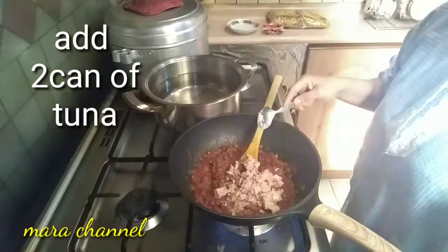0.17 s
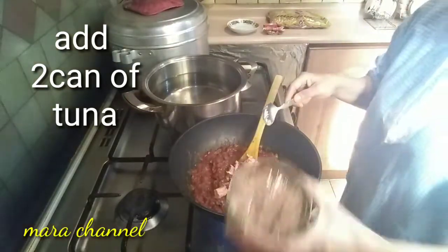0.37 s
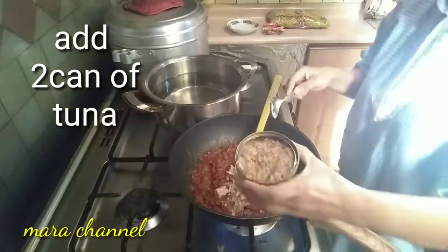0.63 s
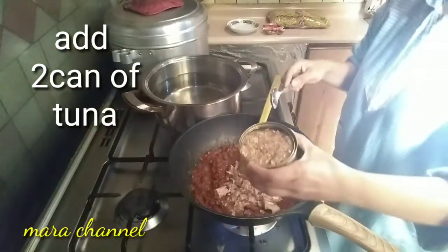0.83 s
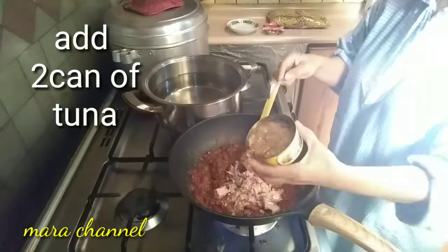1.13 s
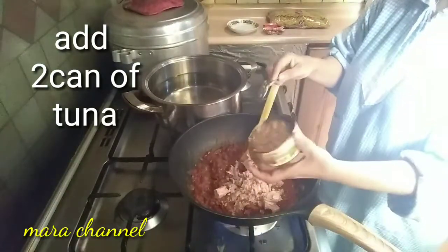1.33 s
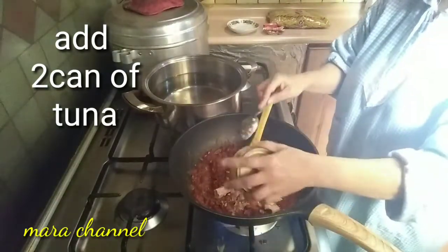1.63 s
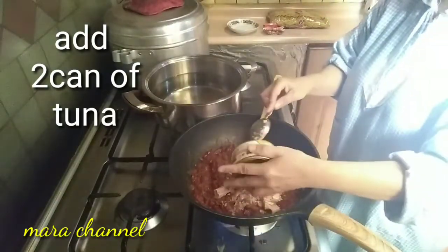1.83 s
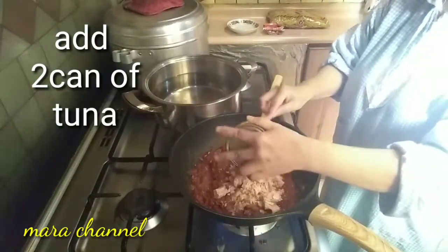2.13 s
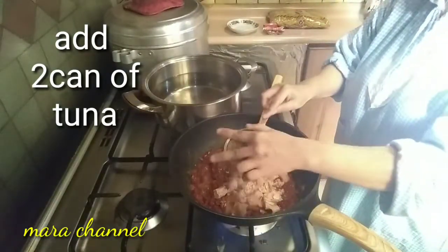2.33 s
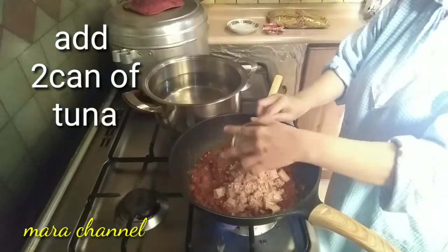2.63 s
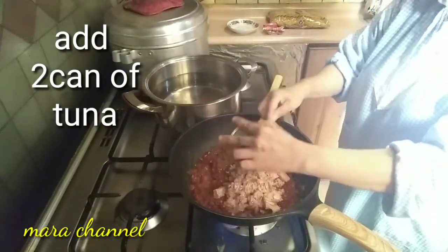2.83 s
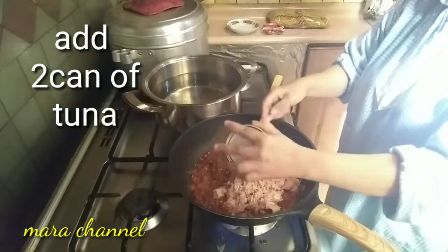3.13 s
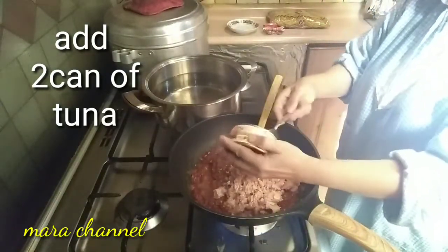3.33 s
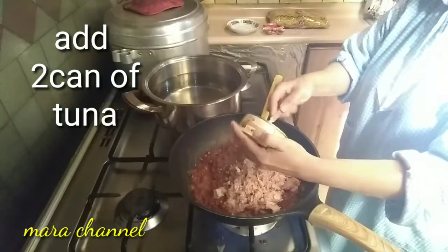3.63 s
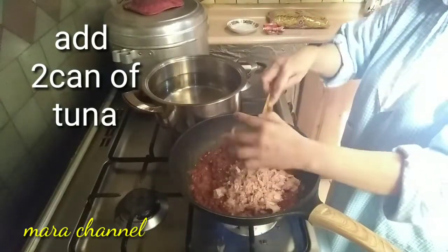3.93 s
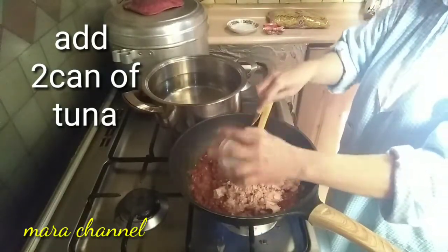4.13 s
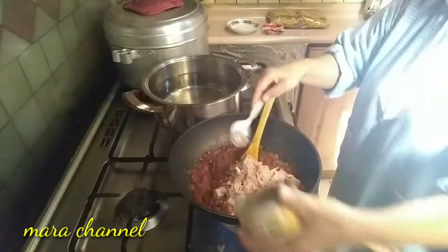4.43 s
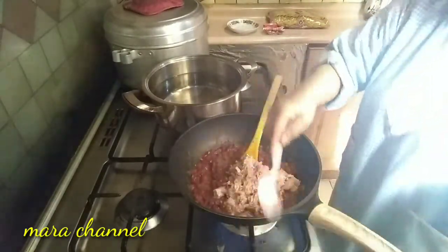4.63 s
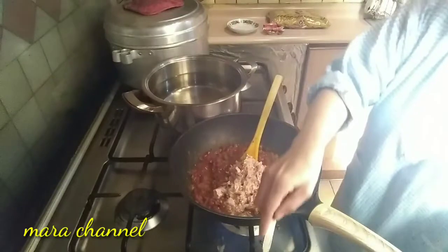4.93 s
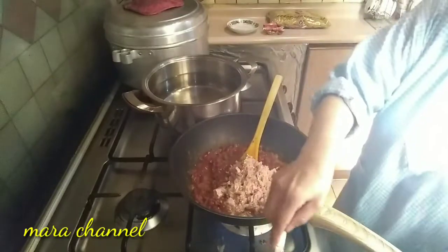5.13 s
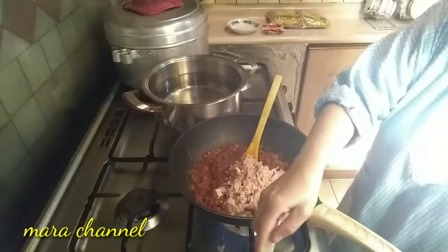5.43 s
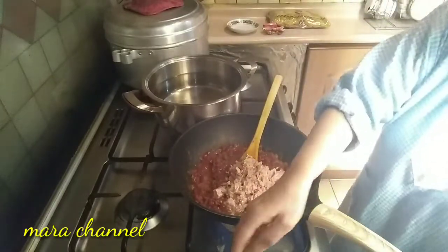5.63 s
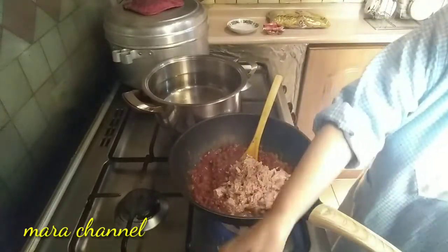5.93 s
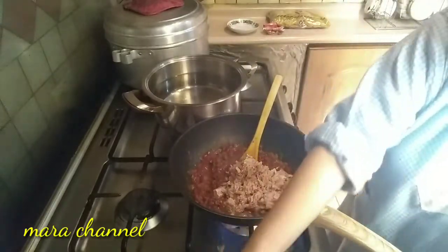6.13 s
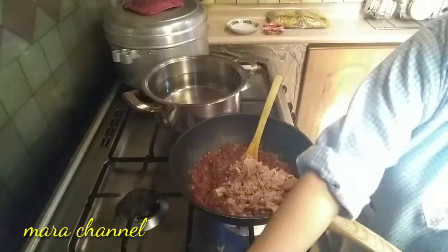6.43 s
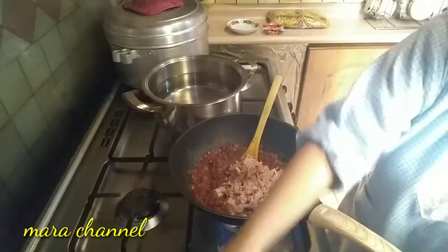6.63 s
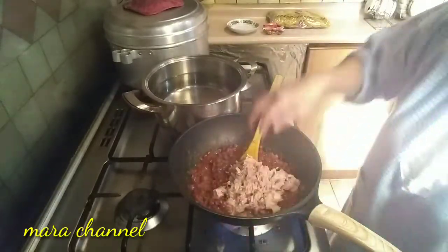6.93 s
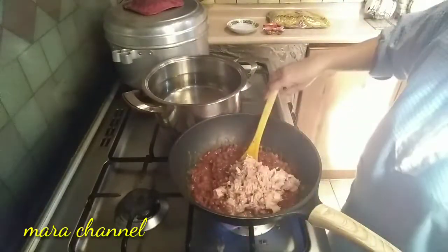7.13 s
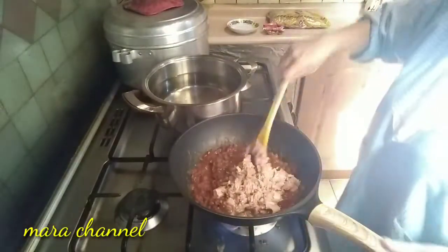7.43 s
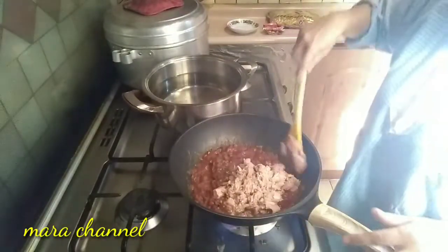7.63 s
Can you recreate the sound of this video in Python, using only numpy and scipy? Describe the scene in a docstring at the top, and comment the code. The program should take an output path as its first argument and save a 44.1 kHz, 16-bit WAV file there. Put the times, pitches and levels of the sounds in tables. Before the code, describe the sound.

A fork taps, knocks and scrapes tuna from a tin over a pan, then clatters down, above a low burner rumble and faint sizzle.

```python
"""First one hears a gas burner rumbling low at the stove and sauce sizzling faintly: shaped noise, narrow
hum resonances and fine pops. Food plops and pan shifts are low decaying sines; slides and cloth are noise.
In front, a fork knocks and scrapes tuna out of a tin can over a frying pan, then is laid down with a clatter:
damped beating modes with a crack and a crash, the scrape a train of tiny slips.
A small tiled kitchen answers with a short diffuse tail; one microphone channel."""
import sys
import numpy as np
from scipy import signal
from scipy.fft import rfft, irfft, next_fast_len
from scipy.io import wavfile
from scipy.ndimage import uniform_filter1d, map_coordinates

SR = 44100
rng = np.random.default_rng(int(sys.argv[2]) if len(sys.argv) > 2 else 0)


def to_wav(s):
    """Save 16-bit WAV."""
    ch = np.atleast_2d(s).T  # columns
    pcm = np.round(np.clip(ch, -1, 1) * 32767)  # PCM
    wavfile.write(sys.argv[1], SR, pcm.astype(np.int16))


N = 342642  # samples

# Spectra and modes carry relative levels; sounds are scaled to their level afterwards.
# burner rumble: [f/Hz, density level/dB]
BURNER = [(12, -55), (20, -30), (38, -11), (46, -28), (64, -4.5), (93, -1.5), (113, 1), (160, -4),
          (178, -3.5), (242, -2.5), (387, -11), (439, -7.5), (630, -12.5), (905, -19.5), (1500, -26.5),
          (1950, -48), (3300, -120)]
# surging low rumble: [f/Hz, density level/dB]
SWELL = [(90, -20), (170, -10), (275, 3.5), (340, -20.5), (460, -18.5), (800, -52), (2000, -120)]
# surges of that rumble, before the swell gain: [start t/s, length t/s, level/dB]
SURGES = [(0, 0.36, -46.5), (.42, 0.059, -42), (.73, 0.027, -34), (4.23, 0.077, -38.5), (6.7, 0.11, -45),
          (7.27, 0.11, -48)]
SURGE_ATTACK_S, SURGE_RELEASE_S = 0.015, 0.11
# narrow resonances of the hum, before the hum gain: [f/Hz, width f/Hz, rms level/dB]
HUM = [(70.3, 13.3, -51), (121.9, 2.9, -54), (153.6, 9.2, -53.5), (192.4, 25, -55), (236.1, 5.2, -56),
       (435, 18, -64.5)]
# sizzling sauce: [f/Hz, density level/dB]
SIZZLE = [(710, -11), (1200, -10.5), (1900, -2), (3200, -3), (4900, -5.5), (6000, -3), (6900, -7),
          (7800, -14), (10000, -17.5), (13500, -23.5), (15500, -30)]
# decay of the tiled kitchen: [f/Hz, t60 t/s]
KITCHEN = [(100, 0.3), (1000, 0.23), (4800, 0.18), (5300, 0.27), (6300, 0.31), (8500, 0.32), (14000, 0.26)]

# dull slides on the stove top: [start t/s, length t/s, level/dB]
SLIDES = [(5.71, 0.08, -53), (5.84, 0.055, -57), (5.955, 0.056, -55), (6.29, 0.052, -52)]
SLIDE_ATTACK_S, SLIDE_RELEASE_S = 0.014, 0.17
# dull knocks on the stove top: [start t/s, length t/s, level/dB]
NUDGES = [(5.488, 0.022, -50), (6.015, 0.012, -46.5)]
# colour of slides and dull knocks: [f/Hz, density level/dB]
SLIDE = [(300, -24), (600, -2), (800, 5), (980, 4), (1250, -10.5), (2300, -19), (7000, -72)]
# faint sleeve rustles as the arm moves: [start t/s, length t/s, level/dB]
RUSTLES = [(4.25, 0.17, -65.5), (4.58, 0.24, -64.5), (7.6, .08, -65)]
# sleeve cloth: [f/Hz, density level/dB]
CLOTH = [(500, -30), (1300, -4), (2300, 2), (3500, -3), (7000, -30)]
# the wooden spoon starts to stir: [start t/s, length t/s, level/dB]
STIR = [(7.71, 0.028, -54.5)]
# soft bumps of food, hand and pan, before rise and bump gain: [t/s, level/dB, f/Hz]
BUMPS = [(0.785, -25, 143.4), (0.829, -22.5, 118), (0.877, -21, 110), (1.11, -29, 211), (1.427, -21, 87),
         (1.489, -26, 144), (1.918, -25, 69.6), (1.971, -20.5, 73), (2.167, -26.5, 77),
         (2.304, -20.5, 66.4), (2.611, -24.5, 78), (2.697, -20, 78), (3.565, -28, 70.6), (4.778, -25, 121),
         (5.245, -31, 73.4), (6.521, -30.5, 200), (7.616, -26.5, 72)]

# tines dragged along the can wall: [start t/s, length t/s, ring level/dB, grit level/dB]
SCRAPES = [(3.598, 0.054, -51, -40), (3.659, 0.069, -42.5, -56), (3.745, 0.045, -50, -55),
           (3.806, 0.074, -39, -45), (3.858, 0.03, -46, -33.5), (3.932, 0.024, -50, -44)]
SCRAPE_ATTACK_S, SCRAPE_RELEASE_S = 0.023, 0.11
# rasp of tines on tin, also colours the spoon: [f/Hz, density level/dB]
GRIT = [(1200, -38), (2250, -25), (2680, -11), (3050, -21), (3580, 12), (3850, -20), (4300, 5), (4800, -19),
        (5150, 7), (5900, 8), (7000, 0), (11000, -13), (14500, -48)]

# light ticks of the tines:
# [t/s, thud, body, ring, shimmer, sparkle level/dB, hardness level/dB]
TICKS = [(2.0772, -49, -48.5, -36, -41.5, -58, -1.5), (2.111, -74, -66, -46.5, -46.5, -67, 0),
         (2.5171, -62, -58.5, -41, -33, -46.5, 2), (2.533, -72, -60, -45, -51, -52, -5),
         (3.052, -80, -75, -70, -60, -70.5, -3), (3.8799, -73, -70, -46.5, -41, -58, -3),
         (3.8925, -75, -70, -50.5, -41, -48, 3)]
# fork blows on the can, and one later tap, perhaps on the pan:
# [t/s, thud, body, ring, shimmer, sparkle level/dB,
# ring length factor, place in the can's modes (0 rim, 1 wall), hardness level/dB]
KNOCKS = [(2.3179, -33, -30.5, -18, -19.5, -33.5, 0.74, 0.24, -4),
          (2.6838, -35, -32, -27.5, -34.5, -43, 0.54, 0.93, -6.5),
          (2.9064, -42.5, -80, -66, -67, -71, 0.43, 0, -15),
          (3.5875, -63, -42.5, -32, -31.5, -45, 0.53, 0.67, -10.5),
          (3.6, -56, -49, -33.5, -34.5, -48, 0.8, 0.65, -17),
          (3.752, -56, -48.5, -52, -50, -80, 0.44, 0.27, -23),
          (3.952, -39, -45, -58, -69, -72, 0.26, 0.02, -22),
          (5.0412, -47.5, -49.5, -46, -44, -44, 0.54, 0.15, -10)]
# fork set down and rocking: [t/s, thud, body, ring, shimmer, sparkle level/dB,
# ring length factor, place (0 tines, 1 handle), hardness level/dB]
CLATTER = [(5.2269, -44.5, -45, -43, -43, -64, 1.6, 0.81, -9),
           (5.292, -36, -40.5, -32, -33, -45.5, 0.92, 0.84, -11),
           (6.4344, -57, -35, -43, -42, -60, 0.45, 0.05, -10),
           (6.4462, -36, -28.5, -29, -31, -47, 0.83, 0.028, -7.5),
           (6.47, -43, -30.5, -35, -47, -62, 0.24, 0, -6),
           (6.483, -39, -40, -28.5, -27.5, -42, 0.5, 0.39, -5),
           (6.4921, -55, -34, -30.5, -35, -48, 0.5, 0.054, -10),
           (6.4961, -45.5, -36, -51, -41, -56, 0.42, 0.13, 1),
           (6.5089, -50, -38.5, -41, -43, -60, 0.33, 0.0049, -7),
           (6.522, -64, -48, -42, -53, -57, 0.3, 0, 6)]
# thud, body, ring, shimmer, sparkle: [low edge f/Hz, high edge f/Hz]
BANDS = [(250, 1100), (1100, 2200), (2200, 4900), (4900, 8000), (8000, 17000)]
# tines ringing freely: [f/Hz, level/dB, t60 t/s]
TINES = [(1455, 0, 0.075), (2393, -4.5, 0.073), (2770, -1.5, 0.14), (3150, 0, 0.14), (4100, 5, .07),
         (5340, 5, 0.075), (6060, 7, 0.064)]
# can with the fork on it, t60 before the length factor: [f/Hz, rim level/dB, wall level/dB, t60 t/s]
CAN = [(623, -3.5, -18, 0.22), (843.5, -16, 0, 0.21), (1451, 2.5, 5, 0.15), (1694, -18, 1.5, 0.28),
       (1886, -17, 0, 0.29), (2404, -3.5, -19.5, 0.1), (2663, -8, 2, 0.28), (3194, -11, -16.5, 0.29),
       (3440, 9, 8, 0.11), (3510, 5, 8.5, 0.06), (4120, 3, -11.5, 0.17), (4290, -3, 2, 0.11),
       (4510, 8, -15, 0.13), (5260, 2.5, 1.5, 0.13), (5570, 3, -7.5, 0.19), (5950, 8, -1, 0.1),
       (6230, -4, 1, 0.075), (7500, -24, -8, 0.11), (12900, 3, -34, 0.08), (15500, 4, -39, 0.076)]
# fork on the stove top, t60 before the length factor: [f/Hz, tines level/dB, handle level/dB, t60 t/s]
FORK = [(1071, 6, -1.5, 0.056), (1167, 11.5, -8, 0.038), (1410, -23, -15.5, 0.19), (2360, 2.5, -7.5, 0.054),
        (2590, -7, -9.5, 0.18), (3460, -19, 7, 0.13), (4110, 3, -6, 0.11), (4320, 2, -4, 0.11),
        (5190, 5, -2, 0.095), (5350, 4, 10, 0.074), (5570, 13, -2, 0.06), (5810, -1, 10, 0.07),
        (5960, 2, -2, 0.11), (7300, -11, -1, 0.084), (9360, -17, -20, .09)]
# crowded, short-lived overtones of thin metal: [f/Hz, density level/dB]
CRASH = [(300, -34), (700, -15), (1100, -6.5), (2100, -7), (2700, -2), (4300, -3.5), (4850, 3.5),
         (5500, 3.5), (6500, 2.5), (7800, -7.5), (11000, -18), (15500, -28)]
LEAD_S = .01  # silence ahead of each blow
TOP_HZ = 15520  # upper band limit of the recorder


def amp(db):
    """Decibels to gain."""
    return 10 ** (np.asarray(db) / 20)


def unit(x):
    """Scale to rms 1."""
    return x / np.sqrt(np.mean(x ** 2) + 1e-20)


def along(points, hz):
    """Interpolate (f/Hz, value) points on a log frequency axis."""
    f, v = np.transpose(points)
    return np.interp(np.log(hz + 1), np.log(f + 1), v)


def wobble(rate):
    """A smooth random curve through rate knots a second."""
    knots = rng.standard_normal(int(N * rate / SR) + 4)
    return map_coordinates(knots, [np.arange(N) * rate / SR])


def filtered(x, response):
    """Multiply the spectrum of x by a response of frequency."""
    m = next_fast_len(len(x) + SR // 4)
    hz = np.fft.rfftfreq(m, 1 / SR)
    return irfft(rfft(x, m) * response(hz), m)[:len(x)]


def coloured(x, spectrum):
    """Shape x by a table of (f/Hz, level/dB) and scale to rms 1."""
    return unit(filtered(x, lambda hz: amp(along(spectrum, hz))))


def noise(spectrum, size):
    """Coloured noise of rms 1."""
    return coloured(rng.standard_normal(size), spectrum)


def patchy(x, depth_db, size):
    """Let spectral regions, size bins of 43 Hz wide, swell and sink on their own; rms 1."""
    z = signal.stft(x, nperseg=1024)[2]
    across_bins = uniform_filter1d(rng.standard_normal(z.shape), size, 0)
    field = uniform_filter1d(across_bins, 6, 1)  # smooth over frames
    return unit(signal.istft(z * amp(depth_db * unit(field)), nperseg=1024)[1][:len(x)])


def strokes(rows, attack_s, release_s):
    """Gain per sample: each stroke builds up, holds for its length, then dies by 60 dB per release."""
    t = np.arange(N) / SR
    gain = np.zeros(N)
    for s, length, db in rows:
        rise = np.clip((t - s) / attack_s, 0, 1)
        fall_db = -60 * np.clip((t - s - length) / release_s, 0, 2)
        gain += rise * amp(db + fall_db)
    return gain


def add(track, s, sound):
    """Mix a sound into the track at time s."""
    part = track[max(round(s * SR), 0):][:len(sound)]
    part += sound[:len(part)]


def in_kitchen(x, wet_db):
    """Direct sound plus a slightly later diffuse tail whose decay time depends on frequency."""
    hz, t, z = signal.stft(rng.standard_normal(SR // 2), SR, nperseg=256)
    decay = amp(-60 * t / along(KITCHEN, hz)[:, None])
    tail = signal.istft(z * decay, SR, nperseg=256)[1]
    tail = np.pad(tail / np.linalg.norm(tail), (130, 0))  # 3 ms behind the direct sound
    return x + amp(wet_db) * signal.fftconvolve(x, tail)[:len(x)]


def burner(level_db=-48.5):
    """The flame's lumpy rumble: low noise whose level and spectral regions waver."""
    return amp(level_db) * patchy(noise(BURNER, N) * amp(wobble(25)), depth_db=3.5, size=3)


def surges(swell_db=-5.0, rest_db=-51, restless_db=6.0):
    """Low rumble at the stove: restless noise that surges at set times."""
    gain = amp(rest_db + restless_db * wobble(4.6)) + strokes(SURGES, SURGE_ATTACK_S, SURGE_RELEASE_S)
    return amp(swell_db) * gain * patchy(noise(SWELL, N), depth_db=5.5, size=2)


def hum(hum_db=-1):
    """Noise through narrow resonances makes a low hum."""
    track = np.zeros(N)
    for hz, width, db in HUM:
        resonance = filtered(rng.standard_normal(N), lambda f: 1 / (1 + ((f - hz) / width * 2) ** 2))
        track += amp(db + hum_db) * unit(resonance)
    return track


def sizzle(level_db=-60.5, pops_per_s=120, pop_db=-15):
    """Fine bubbles in the sauce: hiss mixed with sparse random pops."""
    pops = (rng.random(N) < pops_per_s / SR) * rng.standard_normal(N)
    fizz = patchy(rng.standard_normal(N) + amp(pop_db) * unit(pops), depth_db=1.3, size=14)
    return amp(level_db) * coloured(fizz, SIZZLE)


def stove():
    """The steady background: flame, surges, hum and sauce together."""
    return burner() + surges() + hum() + sizzle()


def sleeve():
    """Cloth rustles as gently uneven noise under slow strokes."""
    gain = strokes(RUSTLES, attack_s=0.035, release_s=0.17)
    return gain * unit(noise(CLOTH, N) * amp(1.1 * wobble(40)))


def spoon():
    """The wet rub of the wooden spoon: a brief stroke of gritty noise."""
    return strokes(STIR, attack_s=0.017, release_s=0.17) * noise(GRIT, N)


def slides():
    """Dull knocks and uneven sliding on the stove top, from noise of fluctuating level."""
    push = strokes(SLIDES, SLIDE_ATTACK_S, SLIDE_RELEASE_S)
    push += strokes(NUDGES, attack_s=0.0016, release_s=0.13)
    return push * unit(noise(SLIDE, N) * amp(2.4 * wobble(100)))


def handling():
    """Sliding, sleeve and spoon with very little of the room."""
    return in_kitchen(slides() + sleeve() + spoon(), wet_db=-25)


def bumps(t60=0.13, rise=0.0055, gain_db=-1):
    """Soft, heavy contacts push a few low cycles out of pan and stove."""
    track, t = np.zeros(N), np.arange(SR // 3) / SR
    for s, db, hz in BUMPS:
        envelope = amp(db + gain_db - 60 * t / t60) * (1 - np.exp(-t / rise))
        add(track, s, envelope * np.sin(2 * np.pi * hz * t))
    return in_kitchen(track, wet_db=-5.0)


def struck(modes, place, length):
    """Modes (f/Hz, level/dB, t60/s) excited between the two ends, with t60 scaled by length for the grip."""
    place = np.clip(place, 0, 1)
    return [(hz, near + place * (far - near), t60 * length) for hz, near, far, t60 in modes]


def ringing(modes, t, scatter_db, waver, split_hz=32):
    """Damped modes in beating pairs; the shifting contact varies strengths and lets phases wander."""
    hz, db, t60 = np.transpose(modes)[:, :, None]
    strength, start, split = rng.standard_normal((3, len(modes), 1))
    walk = np.cumsum(rng.standard_normal((len(modes), len(t))), 1)
    drift = uniform_filter1d(walk, 60, axis=1)
    cycles = hz * t + start + waver * np.sqrt(hz) * drift / SR
    partner = cycles + split_hz * (2 + split) * t  # typically twice split_hz above
    pair = np.sin(2 * np.pi * cycles) + .5 * np.sin(2 * np.pi * partner)
    return np.sum(amp(db + scatter_db * strength - 60 * t / t60) * pair, 0)


def scrape(slips_per_s=1100, damping=0.64, uneven_db=5, bend=0.008):
    """Tines slip in tiny uneven jerks, ringing the can wall under a rasp; changing pressure bends its pitch."""
    slips = (rng.random(N) < slips_per_s / SR) * amp(uneven_db * rng.standard_normal(N))
    wall = [mode for mode in struck(CAN, 1, damping) if 2500 < mode[0] < 7000]
    tone = ringing(wall, np.arange(SR // 4) / SR, scatter_db=1, waver=7)
    ring = signal.fftconvolve(slips, tone)[:N]
    ring = patchy(ring, depth_db=1.5, size=8)  # the moving contact favours now one mode, now another
    ring = map_coordinates(ring, [np.arange(N) + np.cumsum(bend * wobble(20))])
    grit = coloured(slips + 0.18 * rng.standard_normal(N), GRIT)
    ring_rows = [(s, length, db) for s, length, db, _ in SCRAPES]
    grit_rows = [(s, length, db) for s, length, _, db in SCRAPES]
    ring_gain = strokes(ring_rows, SCRAPE_ATTACK_S, SCRAPE_RELEASE_S)
    grit_gain = strokes(grit_rows, SCRAPE_ATTACK_S, SCRAPE_RELEASE_S)
    return in_kitchen(ring_gain * ring + grit_gain * grit, wet_db=-8.0)


def blow(modes, levels, hard_db, crash_t60, rise, crack_db=7, crack_t60=0.0086):
    """Metal on metal: ringing, a sharp crack and a short crash; harder contacts crash more and start faster."""
    t = np.arange(SR // 2) / SR
    overtones = patchy(noise(CRASH, len(t)), depth_db=4.5, size=3)  # each contact favours its own few
    decay = amp(-60 * t / crash_t60) + amp(crack_db - 60 * t / crack_t60)
    crash = amp(hard_db) * decay * overtones
    tone = ringing(modes, t, scatter_db=1, waver=10)
    tone = tone / np.std(tone[:SR // 200])  # by its first 5 ms
    attack = 1 - np.exp(-t * amp(hard_db) / rise)
    lead = round(LEAD_S * SR)  # room for the zero-phase filters to ring ahead
    hit = np.pad(in_kitchen((crash + tone) * attack, wet_db=-4.0), (lead, 0))
    out = np.zeros(len(hit))
    for db, edges in zip(levels, BANDS):
        band = signal.butter(4, edges, "bandpass", fs=SR, output="sos")
        part = signal.sosfiltfilt(band, hit)
        out += amp(db) * part / np.std(part[lead:][:SR // 40])  # level over the first 25 ms
    return out


def ticks(track):
    """Light contacts set the tines ringing freely."""
    for s, *levels, hard_db in TICKS:
        add(track, s - LEAD_S, blow(TINES, levels, hard_db, crash_t60=0.082, rise=0.0006))


def knocks(track):
    """The fork strikes thin metal, mostly the can; the can's modes, mixed by place, serve for every blow."""
    for s, *levels, length, place, hard_db in KNOCKS:
        modes = struck(CAN, place, length)
        add(track, s - LEAD_S, blow(modes, levels, hard_db, crash_t60=0.1 * length, rise=0.0014))


def clatter(track):
    """The fork is set down and rocks on the stove top, landing between tines and handle."""
    for s, *levels, length, place, hard_db in CLATTER:
        modes = struck(FORK, place, length)
        add(track, s - LEAD_S, blow(modes, levels, hard_db, crash_t60=0.11 * length, rise=0.00075))


def metal():
    """All blows of the fork, each with its own room tail."""
    track = np.zeros(N)
    ticks(track)
    knocks(track)
    clatter(track)
    return track


def scene():
    """Everything at the stove, in one channel."""
    return (stove() + handling() + bumps() + scrape() + metal())[None]


def record(dry):
    """The recorder rounds off the highest peaks and keeps nothing above its band limit."""
    rounded = dry / (1 + np.abs(dry / .62) ** 8) ** (1 / 8)
    return np.array([filtered(channel, lambda hz: 1 / (1 + (hz / TOP_HZ) ** 180)) for channel in rounded])


dry = scene()
out = record(dry)
to_wav(out)
```